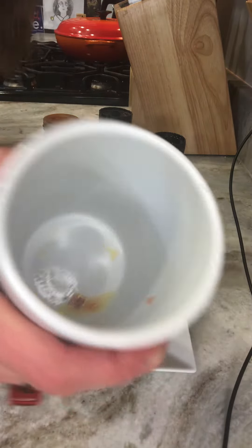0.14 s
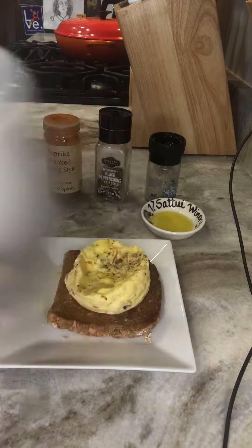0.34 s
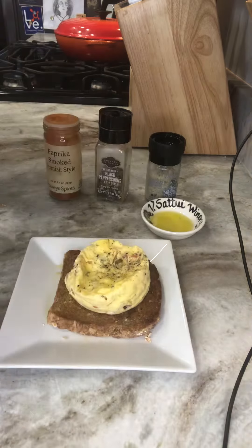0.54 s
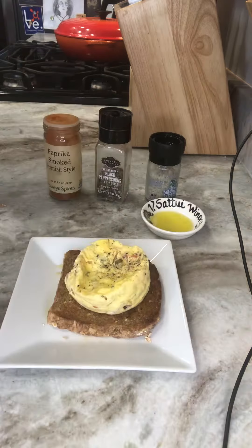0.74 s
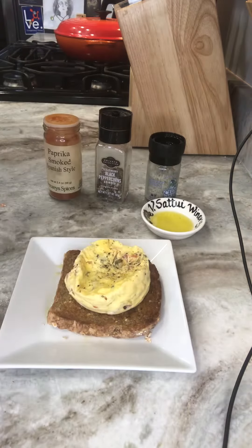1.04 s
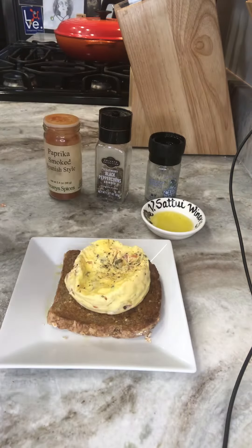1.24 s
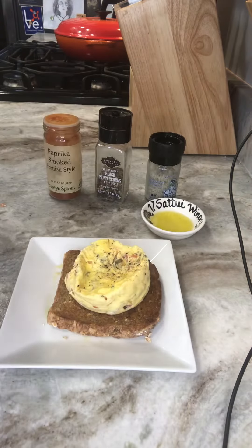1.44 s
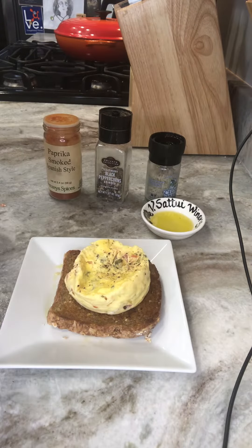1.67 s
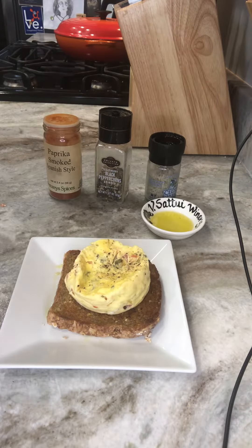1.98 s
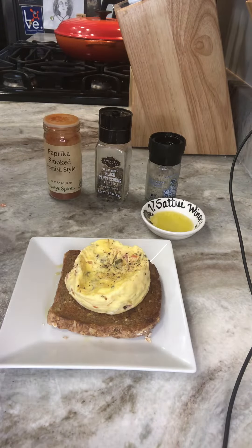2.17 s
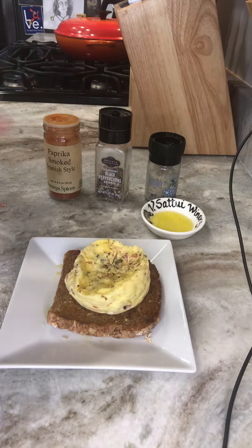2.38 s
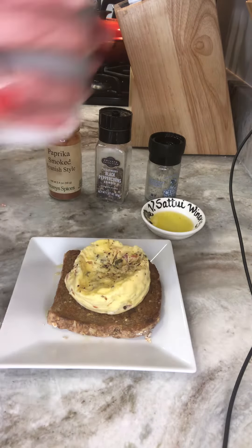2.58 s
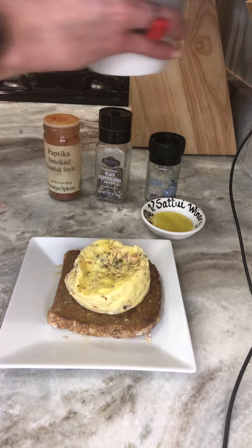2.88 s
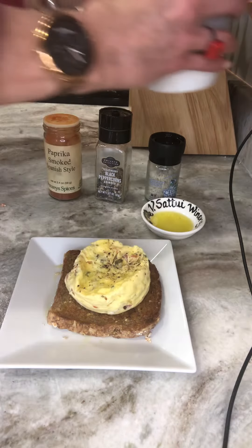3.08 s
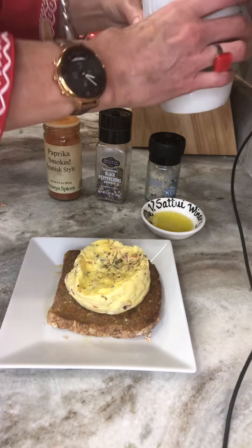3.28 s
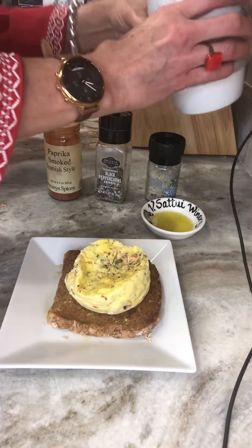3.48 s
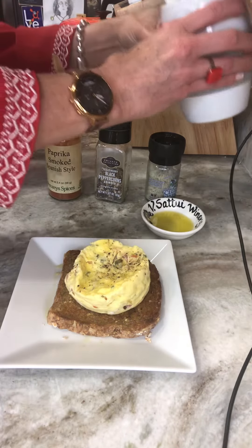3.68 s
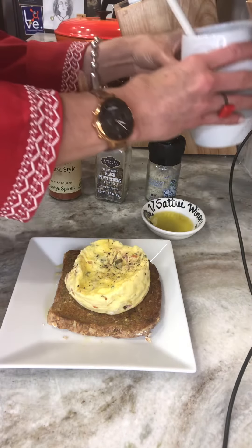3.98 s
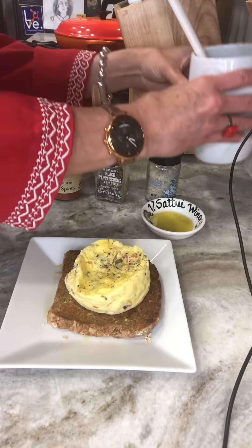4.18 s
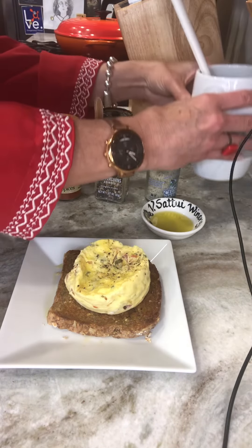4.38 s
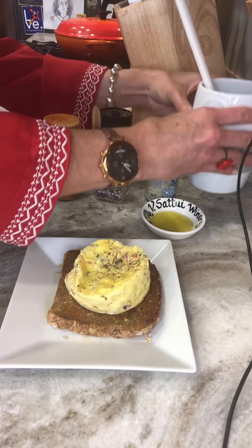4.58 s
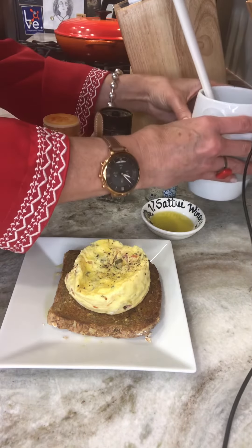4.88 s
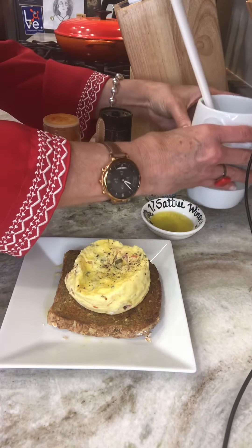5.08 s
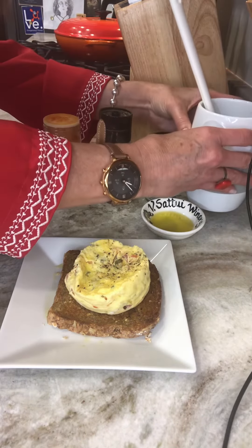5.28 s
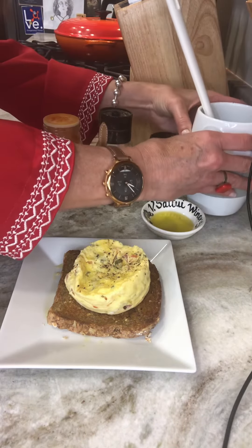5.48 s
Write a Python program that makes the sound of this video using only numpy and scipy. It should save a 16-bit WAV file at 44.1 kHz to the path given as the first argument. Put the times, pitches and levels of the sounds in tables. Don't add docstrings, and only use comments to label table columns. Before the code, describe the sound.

In a small hard-walled kitchen with a low fridge hum, faint finger ticks lead to an empty ceramic mug knocking down on stone. It rocks and drags with a gritty growl and thin rim ringing. A spatula drops in with dull rattling taps amid cloth rustle. After a pause, the mug is set down hard with a damped clunk. Phone microphone, little deep bass.

```python
import sys
import numpy as np
from scipy import signal
from scipy.fft import rfft, irfft
from scipy.io import wavfile
from scipy.ndimage import uniform_filter1d

SR = 44100
rng = np.random.default_rng(int(sys.argv[2]) if len(sys.argv) > 2 else 0)


def invert_db(x):
    u = np.asarray(x, float) / 20
    return 10 ** u


def log_audio(samples):
    frames = np.atleast_2d(samples).T
    limited = np.clip(frames, -1, 1)
    pcm = np.round(limited * 32767).astype(np.int16)
    wavfile.write(sys.argv[1], SR, pcm)


N = 270333
T = np.arange(N) / SR
LEAD_S = 0.04


def unit(x):
    return x / np.sqrt(np.mean(x ** 2))


def peak(x):
    return x / np.abs(x).max(axis=-1, keepdims=True)


def noise(size):
    return rng.standard_normal(size)


def resonance(x, hz, width_hz):
    return signal.lfilter(*signal.iirpeak(hz, hz / width_hz, SR), x)


def band(x, low_hz, high_hz):
    edges_hz = [low_hz, min(high_hz, 0.45 * SR)]
    return signal.sosfilt(signal.butter(2, edges_hz, "bandpass", fs=SR, output="sos"), x)


def walk(rate_hz):
    hold = int(SR / rate_hz)
    steps = np.repeat(noise(N // hold + 1), hold)
    smooth = uniform_filter1d(uniform_filter1d(steps, hold), hold)
    return unit(smooth[:N])


def coloured(points, size):
    hz, db = np.transpose(points)
    bins_hz = np.fft.rfftfreq(size, 1 / SR) + 1
    gain = invert_db(np.interp(np.log(bins_hz), np.log(hz), db))
    return unit(irfft(rfft(noise(size)) * gain, size))


def add(out, start_s, x):
    i = int(start_s * SR)
    out[i:i + len(x)] += x[:len(out) - i]


def held(start_s, length_s, edge_s):
    return np.clip(np.minimum(T - start_s, start_s + length_s - T) / edge_s, 0, 1)


def ramp(t, ms):
    return np.sin(np.pi / 2 * np.clip(1000 * t / ms, 0, 1)) ** 2


def burst(rise_s, t60_s):
    t = T[:SR // 4] - LEAD_S
    return noise(len(t)) * np.where(t < 0, np.exp(t / rise_s), invert_db(-60 * t / t60_s))


def favour(hz, spot_hz, boost_db):
    return boost_db * np.exp(-(np.log(hz / spot_hz) / 0.14) ** 2)


def woken(drive, peaks):
    total = 0
    for hz, width_hz, db in peaks:
        ring = resonance(resonance(drive, hz, 1.6 * width_hz), hz, 1.6 * width_hz)
        total = total + invert_db(db) * np.sqrt(width_hz) * unit(ring)
    return unit(total)


# pitch_hz, t60_s (time to fade by 60 dB), level_db
ROOM_ECHO = [(155, 0.26, -2.5), (500, .5, -18), (1200, 0.29, -10.5), (2500, 0.9, -33), (4780, 0.4, -16.5),
             (10400, 0.087, -8.5)]


def room(x):
    t = T[:int(0.6 * SR)]
    tail = 0
    for hz, t60_s, db in ROOM_ECHO:
        fade = invert_db(db - 60 * t / t60_s) / np.sqrt(t60_s * SR / 14)
        tail = tail + fade * band(noise(len(t)), hz / 2.19, hz * 1.91)
    return x + signal.fftconvolve(x, tail * np.clip(t / 0.0052, 0, 1))[:N]


# pitch_hz, level_db
FRIDGE_TONES = [(118.4, -67.5), (236.9, -69.5), (296.1, -68), (468.3, -79.5), (586.8, -82), (1114, -80),
                (1233, -81), (1292, -80.5), (3521, -103), (3580, -95), (3758, -93), (4581, -94)]
# pitch_hz, level_db (per Hz)
AIR_COLOUR = [(15, -61.5), (25, -45), (49, -7.5), (107, 0), (210, -1.5), (234, -8), (261, -4), (299, -11.5),
              (380, -13), (460, -15.5), (926, -21.5), (1250, -26), (1430, -30), (3660, -35.5),
              (15700, -48.5)]


def kitchen():
    air = coloured(AIR_COLOUR, N) * invert_db(-57 + 0.71 * walk(0.5))
    turn = 2 * np.pi * np.cumsum(1 + 0.002115 * walk(3)) / SR
    tones = sum(invert_db(db + 2.5 + 2.8 * walk(6)) * np.sin(hz * turn) for hz, db in FRIDGE_TONES)
    fan = invert_db(-81) * unit(resonance(noise(N), 1305, 220))
    vent = invert_db(-83) * unit(band(band(noise(N), 3600, 8460), 3500, 8200))
    return air + tones + fan + vent


# start_s, level_db (soft hump),
# sheen_db (against the hump), t60_s
BRUSH_TIMES = [(.521, -69, -8, .03), (0.623, -44, -6.5, 0.029), (.657, -61, -10, 0.044),
               (0.839, -57, -10, 0.041), (1.108, -60, -3.5, 0.069), (1.589, -60, -2.2, 0.075),
               (2.31, -60, -0.6, 0.035), (2.414, -61, -5, 0.047), (2.431, -51.5, -1.5, 0.061),
               (2.784, -66, -14, .04), (3.087, -57, -3, 0.1), (3.115, -50, -7.5, 0.21),
               (3.139, -58.5, -4, 0.13), (3.24, -62, -18, 0.12), (3.45, -65.5, -5, 0.13)]


def brushes():
    sleeve_level = held(1.98, 1.87, edge_s=0.18) * invert_db(-85 + 1.5 * walk(19))
    out = sleeve_level * unit(band(noise(N), 4000, 16000))
    for start_s, hump_db, sheen_db, t60_s in BRUSH_TIMES:
        x = burst(0.21 * (t60_s - 0.02), t60_s)
        hump = band(x, 3170, 6500) + 1.4 * resonance(x, 5870, 1000)
        sheen = band(x, 10600, 15300)
        layers = peak(np.array([hump, sheen]))
        add(out, start_s - LEAD_S, invert_db([hump_db, hump_db + sheen_db]) @ layers)
    return out


# start_s, level_db
BOOM_TIMES = [
    (0.991, -35),
    (1.104, -41),
    (1.462, -38.5),
    (1.653, -43.5),
    (3.066, -44),
    (3.098, -49),
    (5.503, -33),
]


def booms():
    out, t = np.zeros(N), T[:SR // 3]
    for start_s, db in BOOM_TIMES:
        hz = 113.8 - 0.14 * (db + 50)
        fade = invert_db(db - 60 * t / 0.19) * ramp(t, ms=11)
        add(out, start_s, fade * np.sin(2 * np.pi * hz * t))
    return out


# start_s, body_db, thud_db, hiss_db, pitch_hz (favoured)
TAP_TIMES = [(2.573, -63, -74, -80, 3950), (3.064, -36.5, -55, -37, 1860), (3.066, -32, -36.5, -57, 1130),
             (3.073, -42, -38.5, -60, 1400), (3.08, -41, -34, -60, 3060), (3.094, -32, -43, -50, 2270),
             (3.104, -53, -30, -53, 1130), (3.164, -48, -51, -72, 3300), (3.208, -46, -55, -44, 5200),
             (3.212, -41.5, -49, -64, 1130), (3.222, -36.5, -41.5, -65, 3950), (3.238, -51, -44, -72, 3300),
             (3.247, -46, -44, -73, 1400), (3.294, -50, -44, -69, 3300), (3.389, -43.5, -48.5, -74, 3950),
             (3.39, -44, -50, -76, 1300), (3.412, -51, -57, -69, 3300), (3.481, -55.5, -70, -80, 1400)]
# pitch_hz, width_hz, level_db
SPATULA_BODY = [(1130, 150, 16), (1400, 100, 9), (1860, 580, 5.5), (2270, 99, -3), (2500, 90, -3),
                (3060, 330, -2), (3300, 170, -13), (3950, 320, 2), (4580, 190, -4), (5200, 120, 10)]


def spatula_taps():
    out = np.zeros(N)
    for start_s, body_db, thud_db, hiss_db, spot_hz in TAP_TIMES:
        softness_db = max(-44 - body_db, 0)
        t60_s = min(0.02 - 0.2 * (body_db + 32), 0.03)
        x = burst(0.0017 + 0.00018 * softness_db, t60_s)
        body = 0.048 * x
        for hz, width_hz, db in SPATULA_BODY:
            level_db = db + 3.5 * rng.standard_normal() + favour(hz, spot_hz, boost_db=-4)
            body = body + invert_db(level_db) * resonance(x, hz, width_hz)
        ring = peak(resonance(resonance(x, spot_hz, 380), spot_hz, 380))
        body = peak(band(body, 1190, 3540)) + invert_db(-5 + softness_db / 2) * ring
        thud = 1.4 * resonance(x, 119, 78) + 1.4 * resonance(x, 197, 82) + 0.21 * resonance(x, 340, 160)
        layers = peak(np.array([body, band(thud, 57, 660), band(x, 4900, 13000)]))
        add(out, start_s - LEAD_S, invert_db([body_db, thud_db, hiss_db]) @ layers)
    return out


# start_s (crest of the swell), lower_ring_db, upper_ring_db
RIM_CATCHES = [
    (1.0, -97, -78),
    (1.132, -76, -93),
    (1.18, -93, -72),
    (1.334, -72.5, -77),
    (1.42, -70, -81),
    (1.57, -88, -87),
    (1.77, -88, -76),
    (1.858, -75.5, -82),
    (1.91, -73, -80),
]
# pitch_hz, width_hz, level_db
LOWER_RINGS = [(5570, 30, -12), (7530, 30, -18), (9044, 18, 0), (9700, 36, -18)]
UPPER_RINGS = [(12830, 66, -4), (15100, 160, -26), (15720, 40, -8.5)]


def rim():
    grit = noise(N)
    lower, upper = np.zeros(N), np.zeros(N)
    for start_s, lower_db, upper_db in RIM_CATCHES:
        swell = invert_db(np.minimum(302 * (T - start_s), 248 * (start_s - T)))
        lower += invert_db(lower_db) * swell
        upper += invert_db(upper_db) * swell
    return lower * woken(grit, LOWER_RINGS) + upper * woken(grit, UPPER_RINGS)


# start_s, level_db (pressure)
STROKES = [
    [(1.11, -50), (1.21, -55.5), (1.368, -52.5), (1.488, -46.5), (1.586, -58), (1.63, -66)],
    [(1.72, -57), (1.818, -47.5), (1.92, -50), (2.03, -77)],
]
# pitch_hz, width_hz, level_db
DRAG_TONES = [(655, 80, 0), (1254, 79, -27), (1510, 80, -26), (1903, 60, -32), (2480, 130, -33),
              (3050, 160, -48), (3420, 160, -50), (4000, 160, -52), (4370, 120, -56)]
# start_s, length_s, level_db
GROWL_TIMES = [
    (1.137, .46, -53),
    (1.324, 0.16, -52.5),
    (1.794, 0.21, -52),
]


def slide():
    grit = noise(N) * invert_db(2.5 * rng.exponential(size=N) + 0.5 * walk(59.2))
    slab = woken(grit, [(349, 40, 0.5), (437, 56, -0.5)])
    rasp = unit(band(band(grit, 330, 1030), 320, 1370))
    low_tone, wall = woken(grit, DRAG_TONES[:1]), woken(grit, DRAG_TONES[1:])
    mug = low_tone + invert_db(-15) * wall + invert_db(-10.5) * rasp
    pressure, weight = np.zeros(N), np.zeros(N)
    for stroke in STROKES:
        s, db = np.transpose(stroke)
        pressure += held(s[0], s[-1] - s[0], edge_s=0.015) * invert_db(np.interp(T, s, db))
    for start_s, length_s, db in GROWL_TIMES:
        weight += held(start_s, length_s, edge_s=0.057) * invert_db(db)
    return pressure * mug + weight * slab


PART_LIMITS = [0, 480, 900, 5300, 20000]


def contacts(rows, modes, colour, swell_ms, late_ms, scatter_db, crack_db, crack_t60, slab_db, rim_db, edge_db):
    out, t = np.zeros(N), T[:SR // 3]
    hz, db, t60_s = np.transpose(modes)[:, :, None]
    part = np.digitize(hz[:, 0], PART_LIMITS) - 1
    late, swell = ramp(t, late_ms), ramp(t, swell_ms)
    for start_s, strength_db, sharp_db, spot_hz in rows:
        weigh, shift, phase = rng.standard_normal((3, len(modes), 1))
        level_db = db + scatter_db * weigh + favour(hz, spot_hz, boost_db=6.5)
        rings = invert_db(level_db - 60 * t / t60_s) * np.sin(2 * np.pi * (hz + 7 * shift) * t + 3 * phase)
        rises = (late, late, swell, swell)
        parts = peak(np.array([rings[part == k].sum(axis=0) * rise for k, rise in enumerate(rises)]))
        ring = invert_db([slab_db, 0, sharp_db, sharp_db + rim_db]) @ parts
        grain = coloured(colour, len(t))
        grain = grain + invert_db(edge_db) * resonance(grain, spot_hz, spot_hz / 2.6)
        crack = peak(grain * invert_db(-60 * t / crack_t60) * np.sqrt(swell))
        add(out, start_s, invert_db(strength_db) * (ring + invert_db(sharp_db + crack_db) * crack))
    return out


# pitch_hz, level_db, t60_s
MUG_MODES = [(232, -3, 0.042), (334, 1.5, 0.0478), (407, 1, 0.044), (635.5, -2, 0.075), (668.3, -5, 0.056),
             (809, -9, 0.035), (1036, -5.5, 0.038), (1250, 2, 0.043), (1455, -0.5, 0.027),
             (1832, -1.5, 0.03), (1907, 6.5, 0.013), (2450, -7, 0.042), (2620, -7.5, 0.018),
             (3300, -17.5, 0.019), (3700, -18.5, 0.035), (5600, -11.5, 0.059), (7450, -21.5, .05),
             (9044, -1, 0.11), (12830, 7, .08), (15100, -11.5, 0.023)]
# pitch_hz, level_db (per Hz)
CRACK_COLOUR = [(120, -62.5), (200, -24.5), (623, 2), (1020, -6), (2600, -18), (3600, -27), (9580, -55),
                (13100, -47), (16000, -75.5)]
# start_s, strength_db, sharpness_db, pitch_hz (favoured by the wall)
ROCK_TIMES = [(.977, -79, 10.5, 2500), (1.649, -29, -16.5, 1250), (5.492, -56, 25, 2570),
              (5.675, -47, -7.5, 2450), (5.75, -58.5, 2, 1000), (1.118, -34, -11.5, 1250),
              (1.134, -28.5, -15.5, 1800), (1.146, -56, 3, 1250), (1.331, -39, -14.5, 1000),
              (1.351, -33.5, -16.5, 1200), (1.392, -38, -28, 990), (1.413, -38, -14, 1100),
              (1.468, -37, -1.5, 1000), (1.514, -32.5, -38, 1250), (1.545, -33, -17, 1250),
              (1.557, -35.5, -13.5, 1250), (1.575, -35, -21, 2450), (1.761, -33, -19.5, 1800),
              (1.836, -38.5, -13, 2450), (1.856, -34, -17, 1250), (1.871, -34.5, -12.5, 1800),
              (1.895, -37, -10.5, 1250), (1.911, -39.5, -19, 1800), (1.922, -39.5, -17, 2450),
              (1.96, -48.5, -8, 2450), (5.631, -34.5, -6.5, 956), (5.650, -31.5, -18, 1030)]


def rocking():
    return contacts(ROCK_TIMES, MUG_MODES, CRACK_COLOUR, swell_ms=12.0, late_ms=8.2, scatter_db=0.0, crack_db=-1.0,
                    crack_t60=0.0758, slab_db=-14, rim_db=-44, edge_db=6.5)


# start_s, strength_db, sharpness_db (of the edge), pitch_hz (favoured)
KNOCK_TIMES = [
    (.9872, -24, 5.5, 2420),
    (.992, -25, -3, 2300),
    (1.038, -29.5, -11, 1250),
    (1.099, -26.5, -3, 1250),
    (1.4575, -31.5, 3.9, 1190),
    (1.464, -28.5, -4, 1800),
    (1.647, -38, -2.5, 1870),
]


def hard_knocks():
    return contacts(KNOCK_TIMES, MUG_MODES, CRACK_COLOUR, swell_ms=1.1, late_ms=4.16, scatter_db=0.5, crack_db=-3.0,
                    crack_t60=0.039, slab_db=-8.5, rim_db=-46, edge_db=10)


# pitch_hz, level_db, t60_s
HELD_MODES = [(194, -5, 0.053), (222.4, 2.5, 0.049), (308, -7.5, 0.046), (395, -5.5, .07), (477, -9.5, .06),
              (620, -1.5, 0.032), (794, -4, 0.037), (1100, -1, 0.072), (1280, -6, 0.058),
              (1400, -8.5, 0.024), (1536, -5, 0.014), (1800, 0, 0.035), (1930, -1, 0.039),
              (2486, -22.5, 0.23), (2710, -8, 0.024), (3190, -1, 0.025), (3820, -17.5, 0.019),
              (4830, -21, 0.03), (5650, -3, 0.15), (7550, 1, 0.044), (7850, -0.5, 0.037),
              (9044, -0.5, 0.15), (9700, -9, .06), (12830, -11, .05)]
# pitch_hz, level_db (per Hz)
HELD_COLOUR = [(120, -31), (200, -3), (1500, -1), (1770, -0.5), (2170, -11.5), (2650, -5.5), (3500, -18),
               (3970, -14), (6280, -46.5), (7680, -39), (16000, -63.5)]
# start_s, strength_db, sharpness_db, pitch_hz (favoured)
HELD_TIMES = [
    (5.5005, -15, 1.8, 2680),
    (5.521, -23, -5, 1400),
    (5.55, -42, -10, 2500),
]


def set_down():
    return contacts(HELD_TIMES, HELD_MODES, HELD_COLOUR, swell_ms=1.9, late_ms=4.3, scatter_db=3.2, crack_db=2.0,
                    crack_t60=0.047, slab_db=-7.5, rim_db=-30, edge_db=5.5)


def scene():
    mug = rim() + slide() + rocking() + hard_knocks() + set_down()
    return (room(brushes() + booms() + spatula_taps() + mug) + kitchen())[None]


def band_limit(x):
    return signal.sosfilt(signal.butter(12, 16340, fs=SR, output="sos"), x)


def record(dry):
    cut = signal.sosfilt(signal.ellip(12, 0.2, 24, 15780, fs=SR, output="sos"), dry)
    cut = signal.sosfilt(signal.butter(2, 45, "highpass", fs=SR, output="sos"), cut)
    mix = np.tanh(1.6 * cut) / 1.6
    return band_limit(mix)


dry = scene()
out = record(dry)
log_audio(out)
```